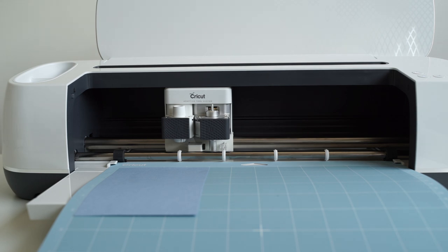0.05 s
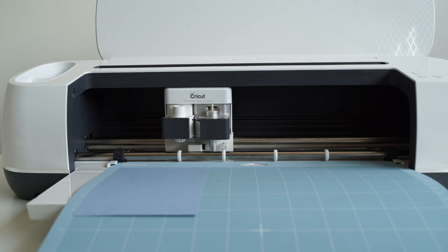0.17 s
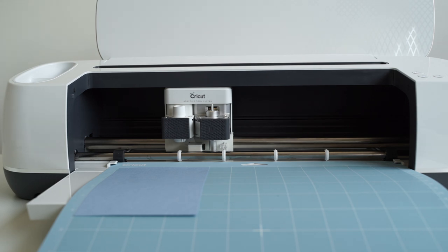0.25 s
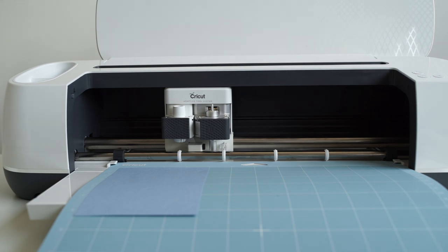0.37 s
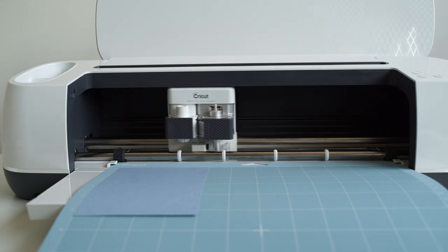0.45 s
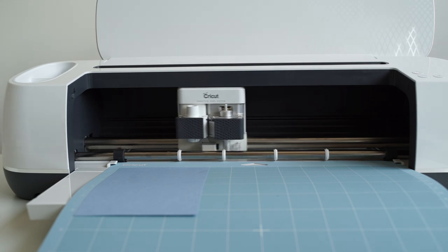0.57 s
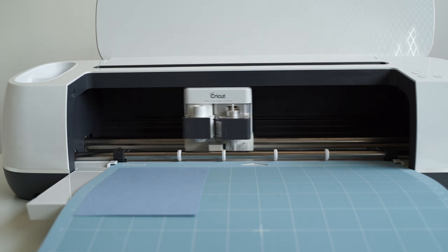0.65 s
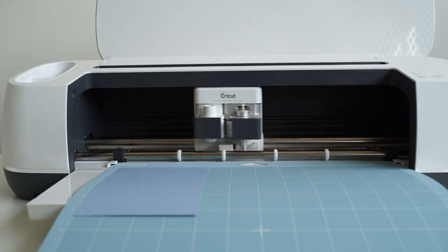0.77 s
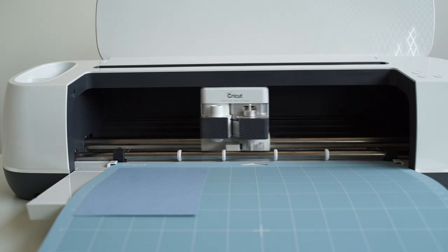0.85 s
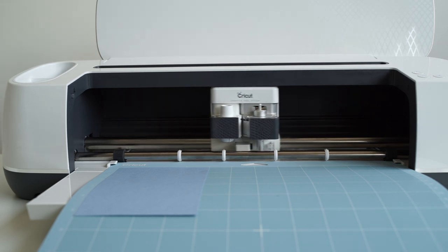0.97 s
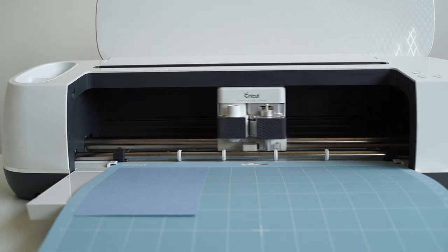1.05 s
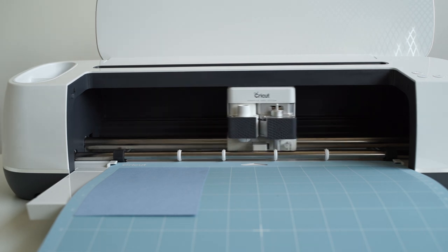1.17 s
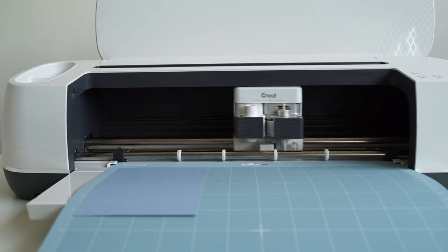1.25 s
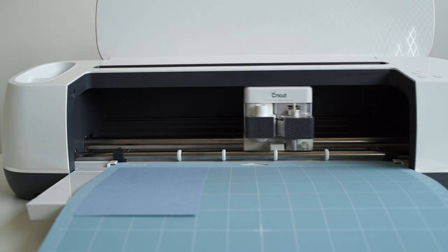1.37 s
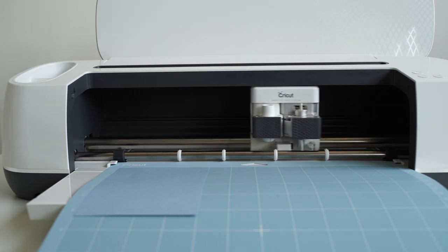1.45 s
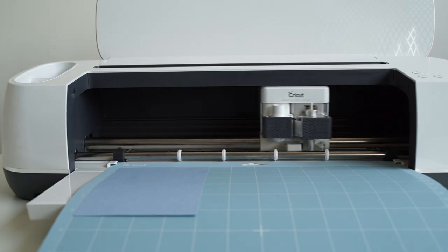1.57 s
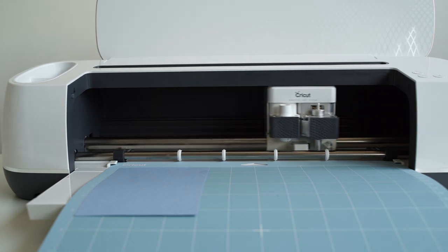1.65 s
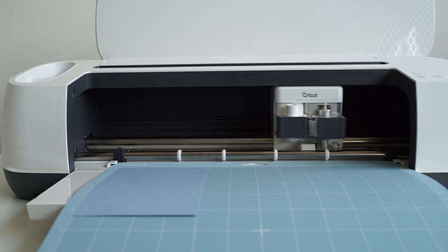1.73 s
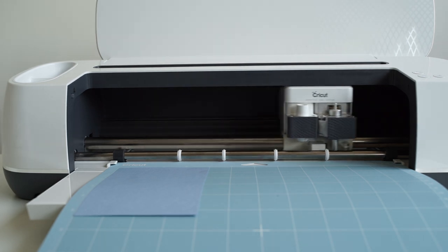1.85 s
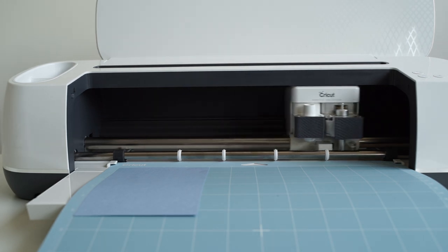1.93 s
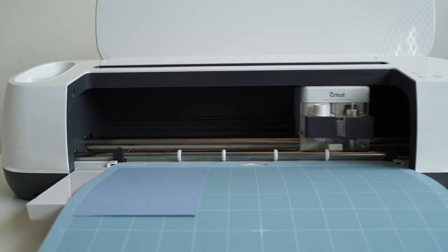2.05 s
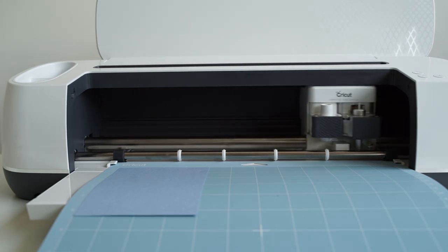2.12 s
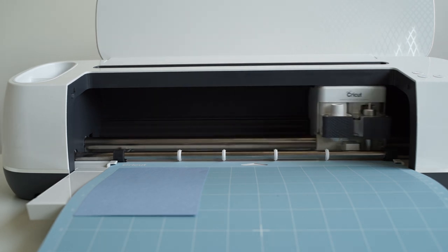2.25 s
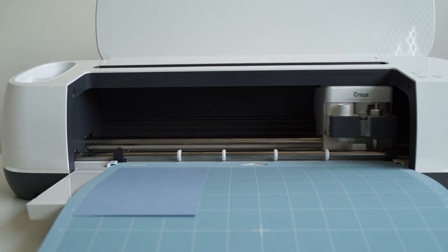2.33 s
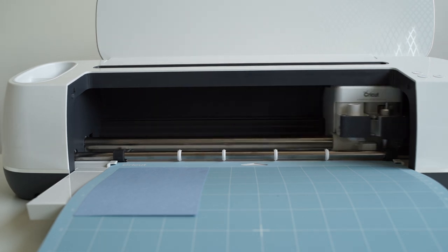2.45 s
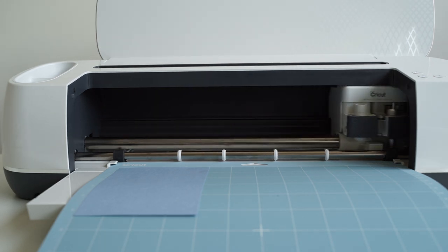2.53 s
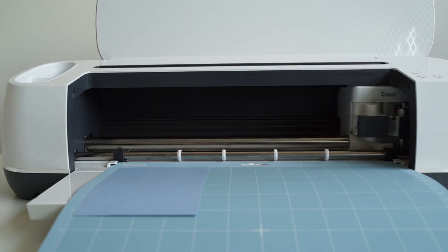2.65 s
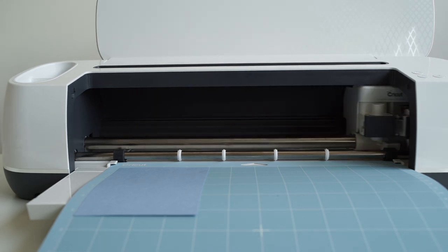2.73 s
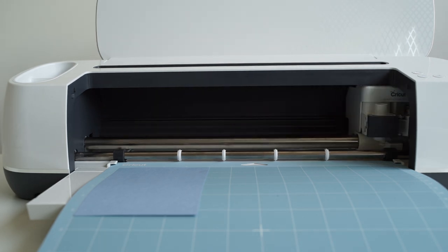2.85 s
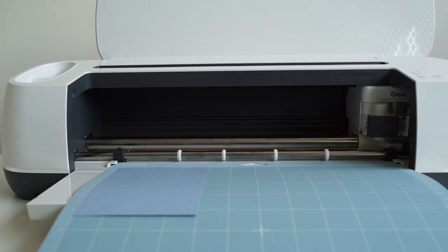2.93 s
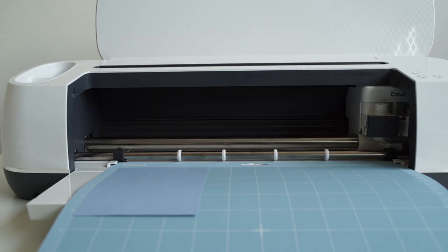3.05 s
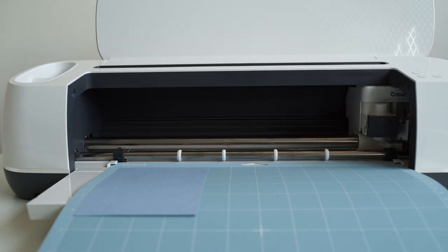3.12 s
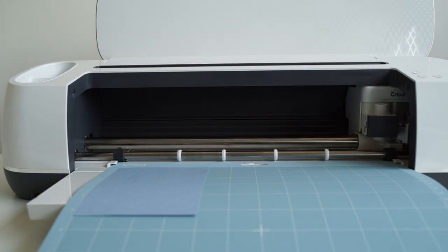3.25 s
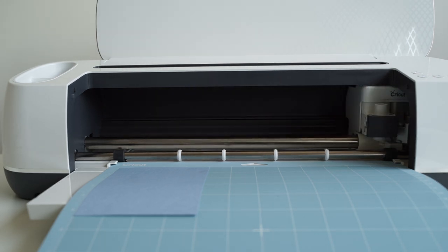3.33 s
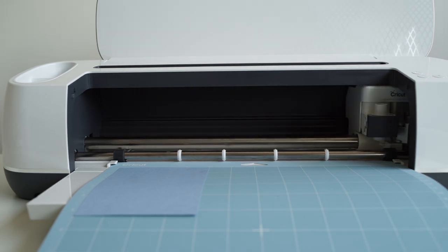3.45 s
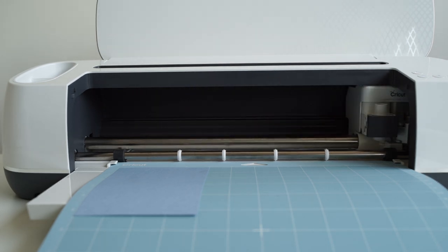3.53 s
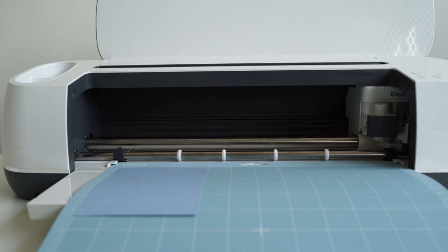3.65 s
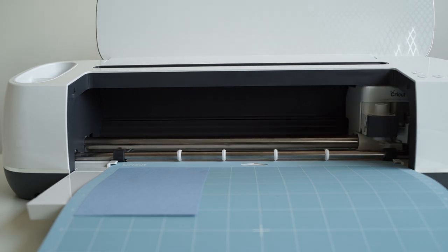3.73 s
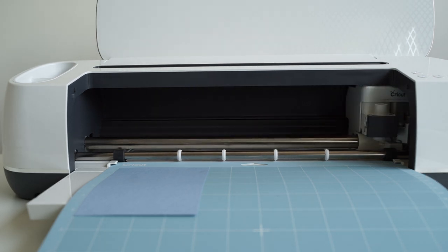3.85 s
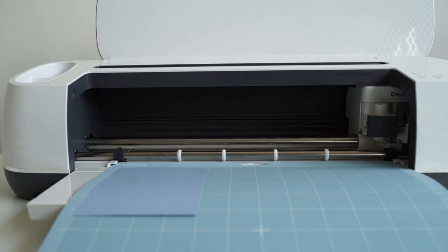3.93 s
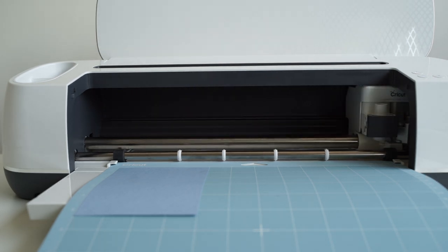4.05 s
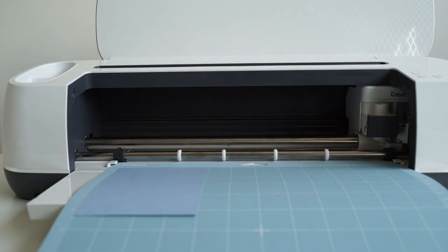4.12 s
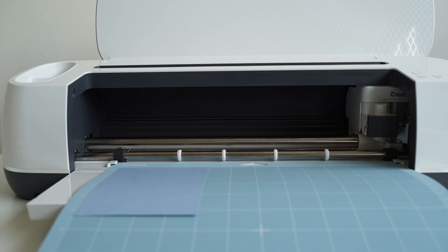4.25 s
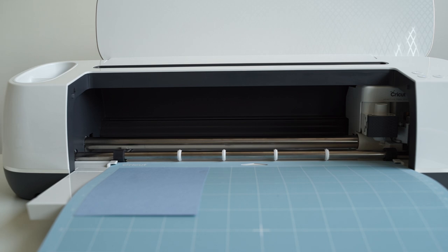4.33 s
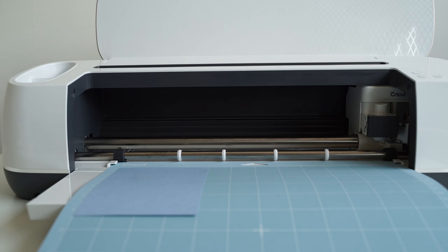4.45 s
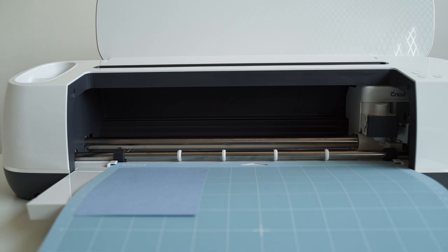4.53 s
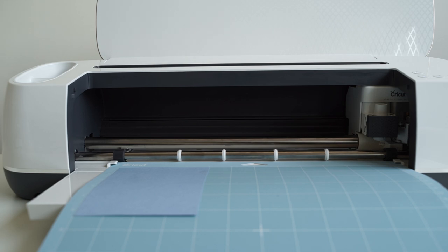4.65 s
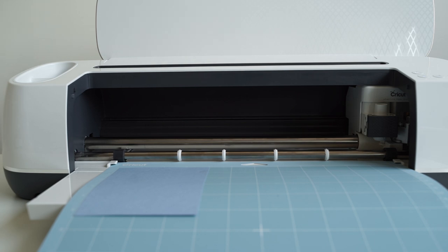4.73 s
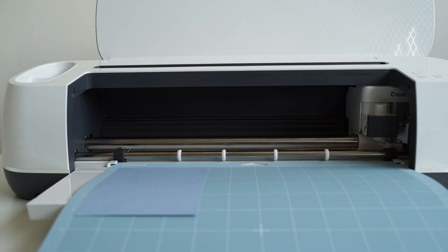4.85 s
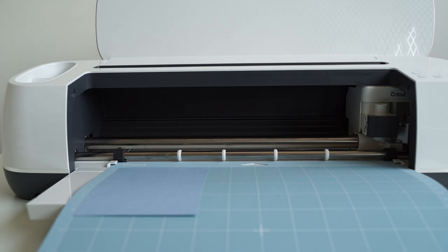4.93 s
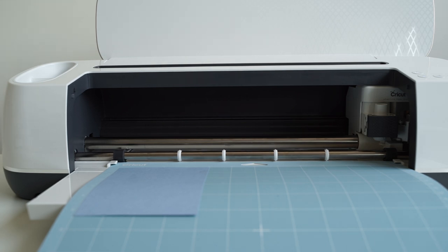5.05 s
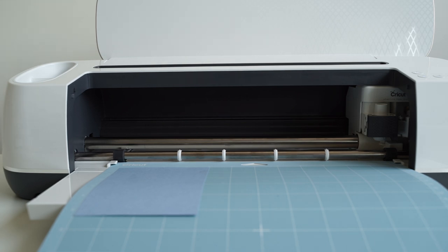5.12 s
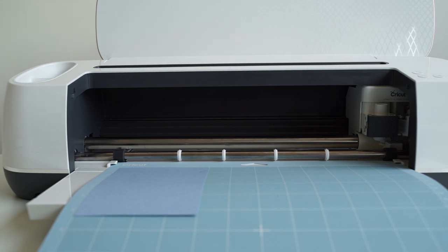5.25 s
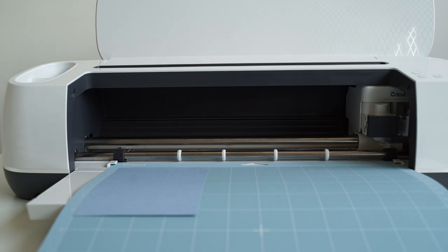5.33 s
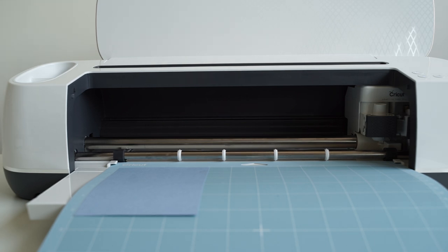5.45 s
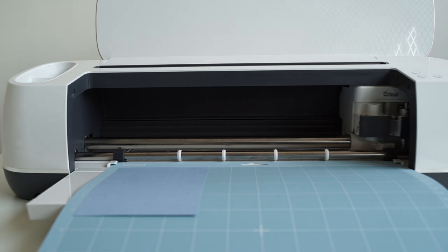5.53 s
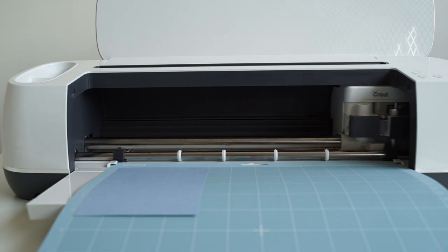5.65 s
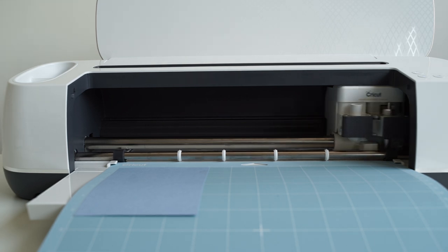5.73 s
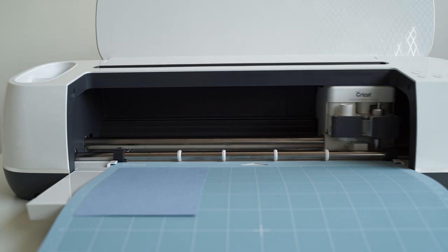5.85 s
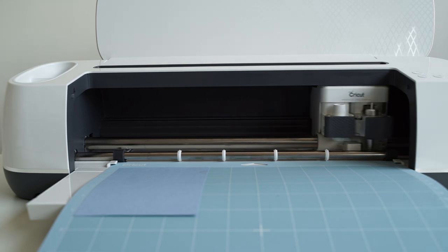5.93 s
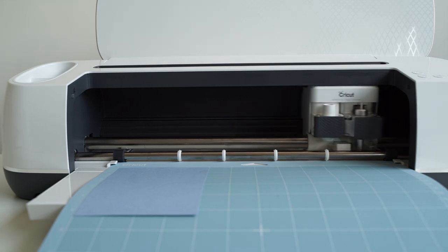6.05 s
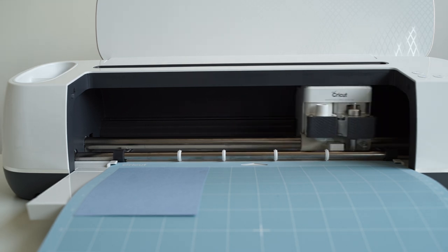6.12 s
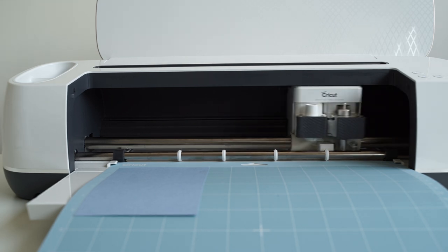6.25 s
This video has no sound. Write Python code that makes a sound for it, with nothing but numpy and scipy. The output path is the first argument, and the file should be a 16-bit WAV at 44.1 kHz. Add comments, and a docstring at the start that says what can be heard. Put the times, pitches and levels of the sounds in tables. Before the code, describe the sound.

Near silence in a quiet room, then a desktop cutting machine starts with a clack and a loud, gear-rattling motor whine. After about two and a half seconds it brakes with knocks and a short squeal, immediately reverses into a harsher, steady whine, then runs down, leaving a softer carriage whir. Close stereo microphone, about a table's width away.

```python
"""Desktop cutting machine

Heard from a table's width away in a quiet room. The feed motor spins up, draws the mat in, stops, reverses
and runs down; the slower carriage motor runs during the first pull and again at the end. Rotation makes
harmonic lines on the shaft orders, gear play makes noise pulsed by the shaft, and the plastic shell's
resonances colour both. Knocks, clacks and late hums are decaying or swelling shell modes; squeals and table
thrum are narrow-band noise. Room air, a faint mains hum and diffuse reflections surround them."""
import sys
import numpy as np
from scipy import signal
from scipy.fft import rfft, irfft
from scipy.io import wavfile
from scipy.ndimage import uniform_filter1d

SR = 44100
rng = np.random.default_rng(int(sys.argv[2]) if len(sys.argv) > 2 else 0)


def dump(signal):
    """Clip the signal to [-1, 1] and save it as 16-bit WAV at the path in sys.argv[1]."""
    limited = np.clip(np.atleast_2d(signal).T, -1, 1)
    pcm = np.round(limited * 32767).astype(np.int16)
    wavfile.write(sys.argv[1], SR, pcm)


N = 276948
T = np.arange(N) / SR  # time [s]
HZ = np.maximum(np.fft.rfftfreq(N, 1 / SR), 1)  # frequency grid [Hz]

# Spectrum of the room air: (frequency [Hz], relative density [dB per Hz])
ROOM_SPECTRUM = [(15, -63), (25, -36), (81, -24), (119, -9), (208, -17), (242, -4), (435, -8), (783, -6.5),
                 (9540, -23.5), (11100, -23), (14500, -58), (22000, -120)]
ROOM_DB = -68
# Mains hum lines: (frequency [Hz], relative level [dB])
HUM_LINES = [(123.8, -76), (247.6, -72.5)]
# Thrum of the table top: (time [s], level before its wander [dB])
THRUM_LEVEL = [(0.45, -88), (0.6, -79), (3.4, -74), (3.6, -66), (4.9, -63.5), (5.3, -83), (5.7, -69),
               (6.28, -71)]
# Table-top modes: (frequency [Hz], width [Hz], peak gain [dB])
THRUM_MODES = [(101, 21, 8.8), (210, 26, 21)]

# Soft knocks: (time [s], peak of the ring [dB], tilt towards the upper modes [dB per octave])
KNOCKS = [(.224, -55.5, 10.5), (2.854, -32.5, -1), (2.874, -26, 4.5), (2.904, -34, -3), (3.154, -37, 3),
          (3.21, -33, 3.5), (3.259, -38, 3), (3.514, -30, 1), (3.675, -27.5, 6), (5.67, -40, -9)]
# Shell modes the knocks excite: (frequency [Hz], relative level [dB], T60 [s])
KNOCK_MODES = [(107, -16.5, 0.16), (200, -4, 0.067), (313.7, 8, 0.095), (490, 5.5, 0.056), (614, 15, 0.024),
               (962, -2, 0.068)]
CRACK_DB, CRACK_S = -31, .02  # dry tick: level against the ring at zero tilt, decay constant

# Carriage motor speed: (time [s], share of full speed [-])
CARRIAGE_SPEED = [(0.435, 0), (0.545, 1), (2.98, 1), (3.1, 0), (5.56, 0), (5.66, 1)]
# Carriage at full speed: (time [s], relative level [dB], lift of the belt-tooth lines [dB])
CARRIAGE_LEVEL = [(0.53, -44, -8.5), (1.2, -44.5, 3), (1.8, -43.5, -0.5), (2.4, -40.5, -0.5),
                  (2.98, -41, -2), (5.67, -39, -1.5), (5.85, -39.5, -4), (6.28, -38.5, -6)]
# Carriage motor lines at full speed: (frequency [Hz], relative level [dB])
CARRIAGE_LINES = [(275.6, -68), (300.6, -70), (334.4, -63), (501, -73), (526, -72), (550.6, -62),
                  (607.8, -60), (701.4, -71), (826.5, -55.5), (876.5, -63), (926.9, -67), (951.9, -70),
                  (1052.1, -67), (1077.2, -69), (1102.2, -48), (1127.1, -61), (1152.0, -60), (1177.4, -67),
                  (1277.6, -70), (1302.8, -67), (1327.3, -59), (1352.7, -64), (1377.8, -59), (1427.9, -60),
                  (1578.2, -71), (1602.9, -64), (1628.1, -62), (1653.2, -56), (1803.6, -69), (1828.7, -71),
                  (1891.4, -67), (1928.7, -63), (1991.3, -61), (2016.9, -64), (2054.1, -70), (2104.2, -68),
                  (2129.3, -67), (2156.5, -60), (2179.4, -66), (2192.0, -66), (2204.4, -65), (2216.9, -62),
                  (2229.5, -66), (5105.7, -73), (5131.1, -74)]
# Spectrum of the belt hiss: (frequency [Hz], relative density [dB per Hz])
BELT_SPECTRUM = [(35, -56), (60, -25), (175, -17.5), (323, -1.5), (438, -12), (608, -3.5), (757, -11),
                 (826, -4.5), (1010, -7), (1120, -18), (1220, -9.5), (2160, -4), (2410, -15.5), (5180, -26),
                 (11100, -32), (14500, -74), (22000, -120)]
# Resonances of the belt hiss: (frequency [Hz], width [Hz], peak gain [dB])
BELT_MODES = [(107, 21, 14), (2860, 570, 9.5), (4050, 140, 4.5), (4270, 100, 10.5), (4730, 180, 13),
              (5190, 250, 9)]
BELT_HZ = 275.55  # belt-tooth rate at full speed
CARRIAGE_POWER = 0.93  # amplitude grows as speed to this power
PULL_MULTIPLE, PULL_LIFT_DB = 6, 5  # this belt-tooth multiple is stronger during the first pull

# Squeals of the rollers taking up load: (time [s], length [s], frequency [Hz], relative level [dB])
SQUEALS = [(.53, .06, 3300, -64), (3.128, 0.21, 3296, -46.5), (5.08, 0.1, 3260, -50)]
SQUEAL_GRAIN_DB = 5
# Clacks as the gear play closes: (time [s], nominal peak [dB], frequency [Hz], T60 [s])
CLACKS = [(.579, -17, 1206, 0.042), (3.008, -21.5, 1290, .07), (3.031, -32.5, 1288, 0.24),
          (3.032, -28.5, 1140, 0.12), (3.181, -18, 1236, 0.046), (5.604, -29, 1187, 0.13)]
CLACK_RISE_S = .0012
# Shell hum as the feed motor runs down: (time [s], rise [s], fade [s], frequency [Hz], relative level [dB])
AFTER_HUM = [(5.6, .04, .13, 611, -40), (5.62, .03, .07, 333, -44)]

# Feed motor speed: (time [s], share of full speed, negative when reversed [-])
FEED_SPEED = [(0.45, 0), (0.595, 1), (2.995, 1), (3.09, 0), (3.192, -1), (5.585, -1), (5.645, -.76),
              (5.74, 0)]
# Feed motor before the fall with speed: (time [s], relative whine level [dB], treble rattle level [dB],
# second pinion-mesh line [dB, scaled as the shaft orders], third pinion-mesh line [dB, likewise])
FEED_LEVELS = [(0.6, -30, -53.5, 12, 1), (0.72, -30, -54.5, 6, 5), (0.97, -29, -51, 10, 0.5),
               (1.15, -29.5, -51, 6, -3.5), (1.62, -29.5, -51.5, 5.5, -4), (1.8, -30, -50.5, -1, -3),
               (2.15, -31, -51, -4, -8), (2.25, -31.5, -51, -31, -1), (2.55, -31, -50.5, -20, 1),
               (2.66, -30, -50.5, -4, -5), (2.98, -31, -51.5, 5.5, -5), (3.2, -29.5, -45, -6, -18),
               (5.05, -29, -44.5, -4.5, -22), (5.2, -28.5, -44.5, -0.5, -22), (5.6, -29, -44, -8, -14),
               (5.66, -31, -41, -17, -17)]
# Shaft orders: (multiple [-], relative level forward with the carriage at left [dB], middle [dB],
# right [dB], relative level in reverse [dB])
ORDER_DB = [(1, -55.0, -59.0, -50.5, -61.0), (2, -37.5, -44.5, -35.0, -41.5),
            (3, -56.0, -45.5, -52.0, -51.0), (4, -33.5, -32.0, -30.5, -33.0),
            (5, -28.0, -23.0, -20.5, -12.5), (6, -21.0, -18.5, -17.0, -20.5),
            (7, -31.0, -30.0, -32.5, -23.0), (8, -25.0, -23.5, -25.5, -11.5),
            (9, -22.5, -23.5, -20.0, -23.0), (10, -11.0, -8.0, -3.5, -6.0), (11, -11.0, -7.0, -6.0, -9.5),
            (12, -29.5, -26.0, -33.5, -24.0), (13, -17.0, -16.5, -15.0, -12.0),
            (14, -14.5, -16.0, -11.5, -16.5), (15, -11.0, -13.5, -11.5, -14.5),
            (16, -10.5, -8.0, -9.5, -24.5), (17, -13.0, -10.0, -4.5, -19.5), (18, -8.0, -5.0, -6.5, -19.5),
            (19, -11.0, -11.0, -12.5, -11.5), (20, -14.5, -15.5, -15.0, -13.5), (21, -1.5, -6.0, 0.5, 2.5),
            (22, 6.5, 1.0, -20.5, -5.0), (23, -8.0, -11.0, -12.0, -11.0), (24, -9.5, -7.0, -6.5, -15.5),
            (25, -24.0, -13.0, -6.5, -9.5), (26, -19.0, -13.0, -15.5, -16.5),
            (27, -9.0, -20.5, -10.5, -15.5), (28, -9.5, -9.0, -9.5, -22.5),
            (29, -23.5, -15.0, -14.0, -22.0), (30, -15.0, -22.0, -8.0, -11.5),
            (31, -16.0, -19.0, -7.5, -18.5), (32, -13.0, -2.5, -3.5, -11.5), (33, 1.5, -5.5, -2.0, -12.5),
            (34, -4.5, -8.5, -3.0, -6.0), (35, -23.5, -14.0, -13.0, -22.5),
            (36, -24.5, -26.5, -23.5, -15.5), (37, -15.5, -14.0, -16.5, -15.5),
            (38, -17.5, -23.5, -12.5, -12.0), (39, -21.5, -17.5, -15.5, -17.5),
            (40, -46.0, -24.0, -21.0, -23.0), (41, -25.5, -22.5, -26.0, -36.0),
            (42, -21.0, -40.0, -24.0, -17.5), (43, -20.5, -19.5, -18.5, -17.5),
            (44, -16.0, -17.5, -17.0, -19.0), (45, -23.5, -19.5, -19.0, -30.5),
            (46, -16.5, -17.0, -15.0, -24.5), (47, -32.5, -46.5, -27.0, -31.5),
            (48, -35.0, -33.5, -25.5, -35.5), (51, -37, -37, -36, -30), (54, -28, -28, -28, -42),
            (55, -34, -32, -30, -30), (56, -34, -34, -33, -29), (57, -40, -36, -34, -30),
            (64, -35, -40, -42, -30), (65, -28, -29, -30, -30), (66, -34, -31, -30, -27),
            (67, -37, -35, -34, -33), (68, -27, -26, -25, -39), (69, -33, -30, -28, -38),
            (70, -32, -32, -32, -38), (77, -35, -34, -34, -36)]
# Times when the carriage is at the left, middle and right: (time [s])
CARRIAGE_PLACES_S = [1., 1.7, 2.3]
# Lines at thirds of the shaft orders: (multiple of a third of the shaft rate [-], relative level forward [dB],
# relative level in reverse [dB]); forward, 53 lies on a carriage line
THIRD_ORDER_LINES = [(19, -33, -26), (23, -36, -29), (25, -38, -27), (32, -35, -29), (50, -33, -28),
                     (53, -19, -37), (58, -28, -24), (62, -7.5, -10), (65, -21, -25), (67, -28, -23),
                     (70, -25, -20), (73, -32, -26), (77, -28, -31), (79, -28, -23), (85, -34, -29),
                     (86, -30, -23), (89, -30, -23), (95, -19, -25), (100, -29, -30), (103, -28, -35),
                     (115, -33, -29), (121, -36, -29), (157, -31, -45)]
# Rattle spectrum going forward: (frequency [Hz], relative density [dB per Hz])
RATTLE_FORWARD = [(35, -73), (60, -34), (360, -12.5), (438, -19.5), (622, -7), (740, -15), (1050, -5),
                  (1310, -6), (1850, -6.5), (2070, -9), (2810, -15.5), (3060, -20), (4160, -17.5),
                  (6160, -31.5), (8940, -42.5), (11100, -39), (14500, -73), (22000, -120)]
# Rattle spectrum in reverse: (frequency [Hz], relative density [dB per Hz])
RATTLE_REVERSE = [(35, -81), (60, -54), (200, -14.5), (254, -18), (309, -9), (557, -10), (622, -5),
                  (740, -10.5), (1100, -5), (1310, -1.5), (1460, -0.5), (2690, -11), (3060, -27),
                  (3980, -24.5), (8560, -44.5), (11100, -39.5), (14500, -90), (22000, -120)]
# Shell resonances: (frequency [Hz], width [Hz], peak gain [dB])
SHELL = [(338, 53, 4), (600, 140, 4.5), (1273, 190, 5.5), (2020, 230, 5.5), (2706, 83, 6), (3320, 140, 4.5),
         (3770, 260, -3), (4110, 57, 4), (8666, 1080, 19), (12740, 290, 7)]
# Narrow rings and dips of the reverse rattle: (frequency [Hz], width [Hz], gain [dB])
REVERSE_RINGS = [(3065, 40, 6), (3340, 150, -4), (3607, 25, 7), (3895, 50, 7), (4100, 70, 4), (4395, 25, 6),
                 (4630, 50, -5), (4967, 30, 9), (5200, 300, -4)]
# Shell modes that ring while the speed changes: (frequency [Hz], width [Hz], peak gain [dB])
STRAIN_MODES = [(620, 330, 2), (1140, 120, 12), (1330, 63, 16.5), (1840, 46, 8)]
# Gear slack and bite: (time of the bite [s], slack length [s], slack change [dB], bite change [dB])
BITES = [(0.574, 0.022, 1.5, -0.5), (0.925, 0.068, -1, 0), (1.073, 0.053, -2.5, 2),
         (1.589, 0.063, -1.5, 0.5), (1.727, 0.041, -1.5, 1), (1.869, 0.085, -1, 1.5),
         (2.144, 0.037, 1.5, 1), (2.658, 0.053, -1.5, 2.5), (2.992, .03, 0.5, 0.5), (3.17, 0.03, -2, -3.5),
         (3.272, 0.036, -1.5, 0), (3.715, 0.034, -1, -1), (3.875, 0.033, -0.5, -1),
         (4.059, 0.048, -0.5, 0.5), (4.337, 0.019, -1, 0.5), (4.527, 0.061, -1, 0.5),
         (4.668, 0.051, -0.5, 0.5), (4.82, 0.032, -1, 0), (5.15, 0.052, -1.5, 1), (5.31, 0.067, -1, 0.5),
         (5.598, 0.022, -2, 1)]
# Gear rattle under the whine, carriage at left, middle, right: (level against the whine scale [dB])
GRIND_DB = [-12.5, -12, -11]
REVERSE_GRIND_DB = -7.5
FEED_HZ, TEETH, WHEEL_RATIO = 62.281, 11, 3  # full shaft rate [Hz], pinion teeth, shaft turns a wheel turn
BITE_EDGE_S, BITE_FADE_S = 0.0032, 0.018
# Extra dB on the second mesh line (reversed, also on its lower neighbour), and dB on the treble,
# for each dB of slack or bite
MESH_SWING, TREBLE_SWING = 4.1, 0.99
TURN_S = 3.09  # stop before reversing
# Fall at zero speed [dB], from and to rest and in the brief stop while reversing
WHINE_REST_DROP_DB, WHINE_TURN_DROP_DB = 25, 14
TREBLE_REST_DROP_DB, TREBLE_TURN_DROP_DB = 47, 20.5
# The whine's fall is this power of the lost speed: braking stays loud longer than starting
BRAKING_POWER, STARTING_POWER = 0.91, 0.8
WAVER, REVERSE_WAVER_PER_ORDER = .1, .003  # slow modulation of a line
ROUGH, REVERSE_ROUGH = .1, .14  # quick modulation of a line
LAG_STEP_TURNS = .45  # spread of the phase step between neighbouring orders
# The loudest reverse line and its two neighbours beat together once a turn, this far out of step
MESH_SKEW_TURNS = .16
ENGAGE_SPEED, FREE_DB = .89, -8  # speeding up, the whine is weaker until the teeth engage

# Stereo width: (frequency [Hz], side minus mid [dB])
SIDE_DB = [(60, -28), (110, -19), (190, -19), (340, -14.5), (600, -14), (1070, -8), (1900, -8), (3370, -1),
           (6000, -2), (10700, 1)]
# Stereo balance: (frequency [Hz], left minus right [dB])
BALANCE_DB = [(60, -1), (110, 0), (190, -0.5), (340, -2), (600, 0), (1070, -1.5), (1900, -2), (3370, -1.5),
              (6000, -1.5), (10700, -3.5)]
TOP_HZ = 11110  # upper band limit


def undb(db):
    """Amplitude ratio from decibels."""
    return 10 ** (np.asarray(db) / 20)


def unit(x):
    """Normalisation to unit root-mean-square."""
    return x / np.sqrt(np.mean(np.abs(x) ** 2))


def over_hz(points):
    """Gain spectrum interpolated in dB over log frequency."""
    hz, db = np.transpose(points)
    return undb(np.interp(np.log(HZ), np.log(np.maximum(hz, 1)), db))


def resonances(modes):
    """Modal colouring: a product of bell-shaped peaks or dips."""
    bells = [1 + (undb(db) - 1) / (1 + (2 * (HZ - hz) / width) ** 2) for hz, width, db in modes]
    return np.prod(bells, axis=0)


def filtered(x, gain):
    """Linear filtering: convolution with the truncated impulse response of this gain."""
    centred = np.roll(irfft(gain, N), N // 2)
    response = centred[N // 2 - SR // 4:N // 2 + SR // 2]
    return signal.fftconvolve(x, response)[SR // 4:SR // 4 + N]


def walk(rate):
    """Random modulation: complex wander between normal knots, about `rate` a second."""
    count = int(N / SR * rate) + 2
    knots, (a, b) = np.linspace(0, N / SR, count), rng.standard_normal((2, count))
    return np.interp(T, knots, a) + 1j * np.interp(T, knots, b)


def partial(turns, slow, quick, scatter=1):
    """Modulated sinusoid: one line with slow waver, quick roughness and a random start phase."""
    modulation = 1 + slow * walk(5) + quick * walk(45)
    return np.real(modulation * np.exp(2j * np.pi * (turns + scatter * rng.random())))


def room():
    """Steady background: shaped noise for quiet air, and the lines of a faint mains hum."""
    air = unit(filtered(rng.standard_normal(N), over_hz(ROOM_SPECTRUM)))
    hum = sum(undb(db + 0.5) * partial(hz * T, slow=0.11, quick=0.043) for hz, db in HUM_LINES)
    return undb(ROOM_DB) * air + hum


def thrum():
    """Modal radiation: the table top rumbles unevenly at its low modes under the machine."""
    s, db = np.transpose(THRUM_LEVEL)
    band = resonances(THRUM_MODES) / (1 + (HZ / 260) ** 6) / (1 + (90 / HZ) ** 4)
    low = filtered(rng.standard_normal(N), band)
    return undb(np.interp(T, s, db) + 2.3 * walk(12).real) * unit(low)


def knocks():
    """Impact excitation: a soft push into damped shell modes, each blow shared out afresh."""
    out, t = np.zeros(N), np.arange(int(.2 * SR)) / SR
    for s, db, tilt_db in KNOCKS:
        ring = 0
        for hz, mode_db, t60 in KNOCK_MODES:
            level_db = mode_db + tilt_db * np.log2(hz / 310) + 2 * rng.standard_normal()
            decay = np.exp(-np.log(1000) * t / t60)
            ring = ring + undb(level_db) * np.sin(2 * np.pi * hz * t) * decay
        ring = ring * (1 - np.exp(-t / 0.011))  # soft onset
        # the dry tick grows with the tilt
        crack = undb(CRACK_DB + 2 * tilt_db) * np.exp(-t / CRACK_S) * rng.standard_normal(len(t))
        i = int(s * SR)
        out[i:i + len(t)] += undb(db) * (ring / np.abs(ring).max() + crack)
    return out


def carriage():
    """Periodic engagement: belt teeth and gears hum; the sliding carriage hisses once a tooth."""
    s, *columns = np.transpose(CARRIAGE_LEVEL)
    level_db, tooth_lift_db = (np.interp(T, s, c) for c in columns)
    speed = np.interp(T, *np.transpose(CARRIAGE_SPEED))
    run_s = np.cumsum(speed) / SR  # equivalent time at full speed
    hum = 0
    for hz, db in CARRIAGE_LINES:
        multiple = round(hz / BELT_HZ)
        on_tooth = abs(hz / BELT_HZ - multiple) < .005
        pull_lift_db = PULL_LIFT_DB * (multiple == PULL_MULTIPLE) * (T < TURN_S)
        line_db = db + on_tooth * (tooth_lift_db + pull_lift_db)
        hum = hum + undb(line_db) * partial(hz * run_s, slow=0.069, quick=0.11)
    teeth = np.exp(0.23 * np.cos(2 * np.pi * BELT_HZ * run_s)) * undb(.9 * walk(25).real)
    hiss = filtered(teeth * rng.standard_normal(N), over_hz(BELT_SPECTRUM) * resonances(BELT_MODES))
    sound = undb(45.5) * hum + undb(-8.5) * unit(hiss)
    return speed ** CARRIAGE_POWER * undb(level_db) * sound


def squeals():
    """Narrow-band noise: rough, broken roller tones that swell and fade."""
    out = 0
    for s, length, hz, db in SQUEALS:
        level = undb(db + SQUEAL_GRAIN_DB * walk(90).real)
        swell = np.sin(np.pi * np.clip((T - s) / length, 0, 1))
        band = np.real(walk(420) * np.exp(2j * np.pi * hz * T))
        out = out + level * swell * band
    return out


def clacks():
    """Free decay: closing gear play sets off short rings of the shell."""
    out = 0
    for s, db, hz, t60 in CLACKS:
        t = np.maximum(T - s, 0)
        envelope = (1 - np.exp(-t / CLACK_RISE_S)) * np.exp(-np.log(1000) * t / t60)
        out = out + undb(db) * envelope * np.sin(2 * np.pi * hz * t)
    return out


def after_hum():
    """Lingering resonance: low shell tones swell and die away as the feed motor runs down."""
    out = 0
    for s, rise, fade, hz, db in AFTER_HUM:
        t = np.maximum(T - s, 0)
        envelope = np.minimum(t / rise, 1) * np.exp(-(t / fade) ** 2 / 2)
        out = out + undb(db) * envelope * partial(hz * T, slow=0.087, quick=0.19)
    return out


def bites():
    """Backlash: the level in dB shifts while gears run slack, then steps at the bite and recovers."""
    def step(s):
        return .5 + .5 * np.tanh((T - s) / BITE_EDGE_S)

    swing_db = 0
    for s, length, slack_db, bite_db in BITES:
        slack = step(s - length) - step(s)
        bite = step(s) * np.exp(-np.maximum(T - s, 0) / BITE_FADE_S)
        swing_db = swing_db + slack_db * slack + bite_db * bite
    return swing_db


def repeating(turns, samples):
    """Cyclic noise: worn-tooth clatter returns every turn, two patterns slowly trading places."""
    place, trade = turns % 1 * samples, .5 * walk(3).real
    a, b = (np.interp(place, np.arange(samples), rng.standard_normal(samples), period=samples)
            for _ in range(2))
    return unit(np.cos(trade) * a + np.sin(trade) * b)


def feed_whine(speed, turns, swing_db, second_db, third_db):
    """Order spectrum: shaft harmonics and lines at their thirds follow the speed and slide through shell
    resonances."""
    back, pace = speed < 0, np.abs(speed)
    ringing = (over_hz(RATTLE_REVERSE) * resonances(SHELL) * resonances(REVERSE_RINGS)
               * resonances(STRAIN_MODES))
    # neighbouring orders keep loosely in step, so the whine throbs a little once a turn
    lags = np.cumsum(LAG_STEP_TURNS * rng.standard_normal(len(ORDER_DB)))
    lags[2 * TEETH - 1] = 2 * lags[2 * TEETH - 2] - lags[2 * TEETH - 3] + MESH_SKEW_TURNS
    rough = np.where(back, REVERSE_ROUGH, ROUGH)
    whine = 0
    for (k, *forward_db, reverse_db), lag in zip(ORDER_DB, lags):
        # the carriage's place changes how the shell sounds
        db = np.where(back, reverse_db, np.interp(T, CARRIAGE_PLACES_S, forward_db))
        # off full speed a line swells as it slides through a resonance of the shell
        gain_ratio = np.interp(k * FEED_HZ * pace, HZ, ringing) / np.interp(k * FEED_HZ, HZ, ringing)
        sliding = gain_ratio ** 0.67 * pace ** 3.2
        # the mesh lines follow the load on the teeth instead
        if k == 2 * TEETH - 1:
            db = db + back * MESH_SWING * swing_db
        elif k == 2 * TEETH:
            db = second_db + MESH_SWING * swing_db
        elif k == 3 * TEETH:
            db = third_db
        waver = WAVER + back * REVERSE_WAVER_PER_ORDER * k
        whine = whine + sliding * undb(db) * partial(k * turns + lag, waver, rough, scatter=0)
    for order, forward_db, reverse_db in THIRD_ORDER_LINES:
        db = np.where(back, reverse_db, forward_db) + 4.5
        line = partial(order * turns / WHEEL_RATIO, slow=0.2, quick=0.3)
        whine = whine + speed ** 4 * undb(db) * line
    free = (np.gradient(pace) > 0) & (pace < ENGAGE_SPEED)
    free_db = FREE_DB * uniform_filter1d(1. * free, size=100)
    return whine / np.where(back, undb(5.0), undb(8.0)) * undb(free_db)


def gear_rattle(speed, turns):
    """Cyclic modulation: noise puffs with the shaft, partly repeats, and is coloured by the shell."""
    back = speed < 0
    beats = [(1, .11), (2, .17), (5, .08), (TEETH, .1)]  # (puffs a turn, depth)
    puffs = np.exp(sum(depth * np.cos(2 * np.pi * (k * turns + rng.random())) for k, depth in beats))
    puffs = puffs * undb(1.54 * walk(14).real)
    per_turn, fresh = round(SR / FEED_HZ), rng.standard_normal(N)
    low = puffs * (fresh + 0.28 * repeating(turns / WHEEL_RATIO, per_turn * WHEEL_RATIO))
    high = puffs * (fresh + 0.35 * repeating(turns, per_turn))
    forward = over_hz(RATTLE_FORWARD) * resonances(SHELL)
    reverse = over_hz(RATTLE_REVERSE) * resonances(SHELL) * resonances(REVERSE_RINGS)
    below, above = 1 / (1 + (HZ / 3000) ** 8), 1 / (1 + (3000 / HZ) ** 8)
    body = np.where(back, unit(filtered(low, reverse * below)), unit(filtered(low, forward * below)))
    treble = np.where(back, unit(filtered(high, reverse * above)), unit(filtered(high, forward * above)))
    # speeding up or braking, the slack gears beat on the shell's strongest modes
    strain_band = resonances(STRAIN_MODES) / (1 + (HZ / 2400) ** 4) / (1 + (300 / HZ) ** 4)
    strain = np.sqrt((1 - speed ** 8) * (0.28 + np.abs(speed))) * unit(filtered(low, strain_band))
    return body, treble, strain


def feed():
    """Rotating source: order whine and gear rattle share one shaft and fall in level with its speed."""
    speed = np.interp(T, *np.transpose(FEED_SPEED))
    pace = np.abs(speed)
    turns = np.cumsum(pace) * FEED_HZ / SR
    s, *columns = np.transpose(FEED_LEVELS)
    whine_db, treble_db, second_db, third_db = (np.interp(T, s, c) for c in columns)
    swing_db, turning = bites(), np.abs(T - TURN_S) < 1
    lost = (1 - pace) ** np.where(np.gradient(pace) < 0, BRAKING_POWER, STARTING_POWER)
    whine_drop_db = np.where(turning, WHINE_TURN_DROP_DB, WHINE_REST_DROP_DB) * lost
    treble_drop_db = np.where(turning, TREBLE_TURN_DROP_DB, TREBLE_REST_DROP_DB) * (1 - pace)
    whine_db = whine_db - whine_drop_db + swing_db
    treble_db = treble_db - treble_drop_db + TREBLE_SWING * swing_db
    whine = feed_whine(speed, turns, swing_db, second_db, third_db)
    body, treble, strain = gear_rattle(speed, turns)
    forward_grind_db = np.interp(T, CARRIAGE_PLACES_S, GRIND_DB)
    grind_db = np.where(speed < 0, REVERSE_GRIND_DB, forward_grind_db)
    main = whine + undb(grind_db) * pace ** 0.31 * body + undb(-4.0) * strain
    running = uniform_filter1d(1. * (speed != 0), size=1500)
    return running * (undb(whine_db) * main + undb(treble_db) * treble)


def scene():
    """Diffuse-field stereo: both channels share a mid; a side with phases varying by pitch parts them."""
    background = room() + thrum()
    machine = knocks() + carriage() + squeals() + clacks() + after_hum() + feed()
    mid = background + machine
    echo = rfft(rng.standard_normal(N) * np.exp(-np.log(1000) * T / .45))
    # long waves differ more by arrival time
    turn = (.5 * echo.real + 1j * echo.imag) / np.abs(echo) + 1j * np.minimum(1200 / HZ, .7)
    side = filtered(mid, over_hz(SIDE_DB) * turn / np.abs(turn))
    lean = np.sqrt(over_hz(BALANCE_DB))
    return np.array([filtered(mid + side, lean), filtered(mid - side, 1 / lean)])


def record(dry):
    """Band limitation: the microphone drops deep bass and adds faint hiss; a low-pass cuts the top."""
    thin = signal.sosfilt(signal.butter(2, 85, "highpass", fs=SR, output="sos"), dry)
    hiss_gain = 1 / (1 + (HZ / 60) ** 2)
    hiss = undb(-88) * np.array([unit(filtered(c, hiss_gain)) for c in rng.standard_normal((2, N))])
    top_cut = signal.ellip(12, .2, 80, TOP_HZ, fs=SR, output="sos")
    return signal.sosfilt(top_cut, thin + hiss)


dry = scene()
out = record(dry)
dump(out)
```